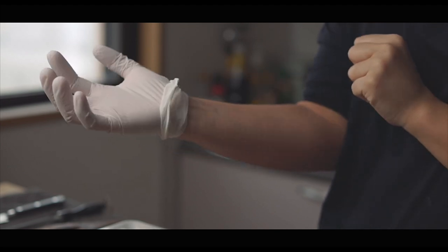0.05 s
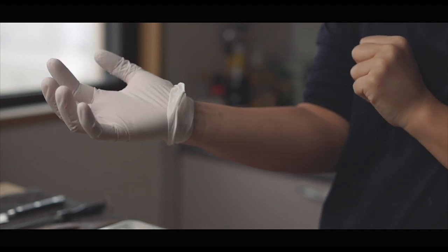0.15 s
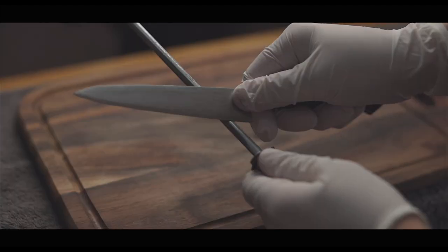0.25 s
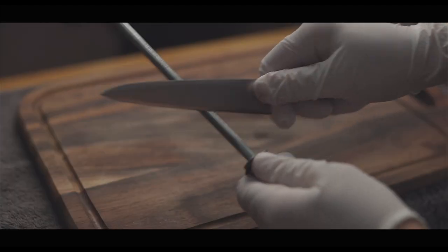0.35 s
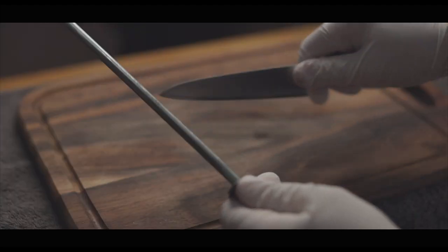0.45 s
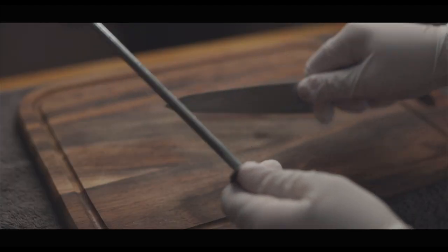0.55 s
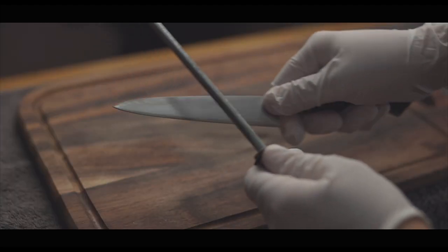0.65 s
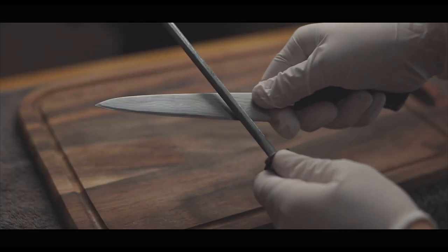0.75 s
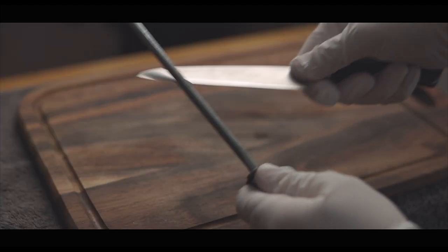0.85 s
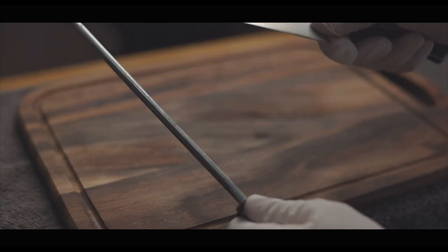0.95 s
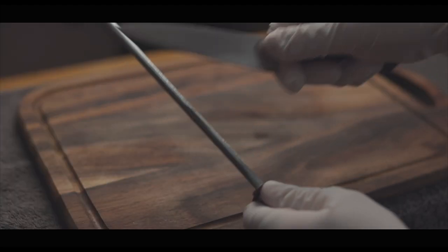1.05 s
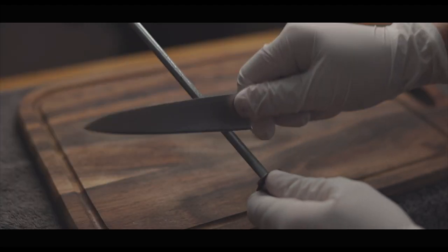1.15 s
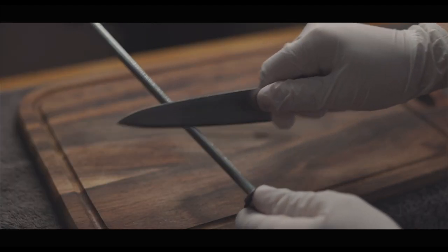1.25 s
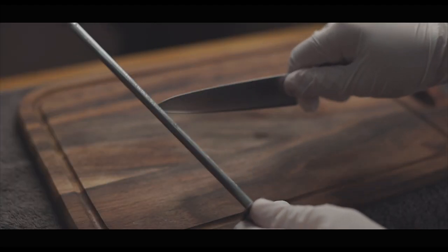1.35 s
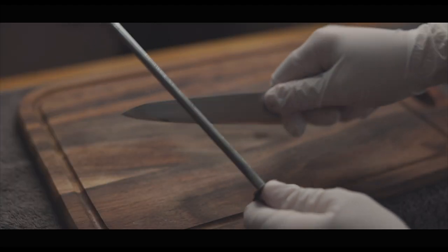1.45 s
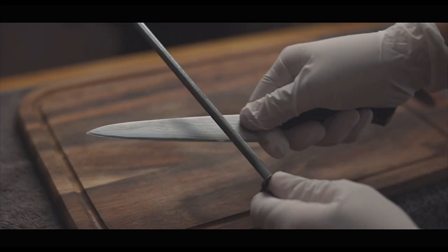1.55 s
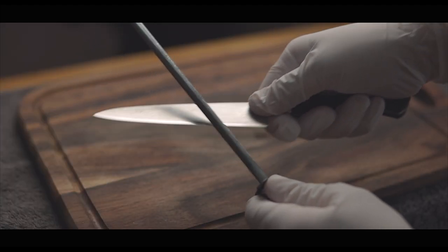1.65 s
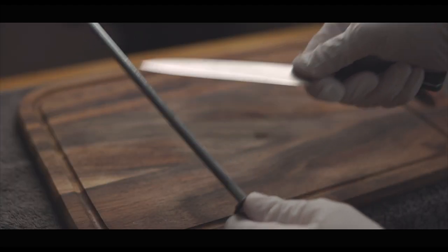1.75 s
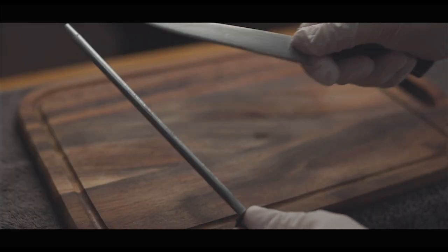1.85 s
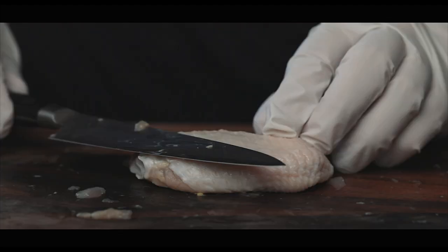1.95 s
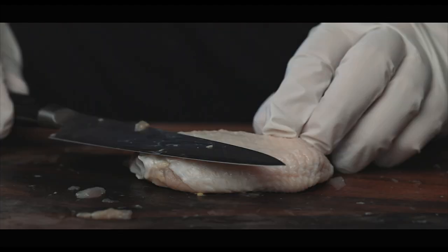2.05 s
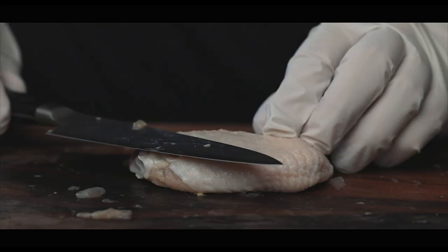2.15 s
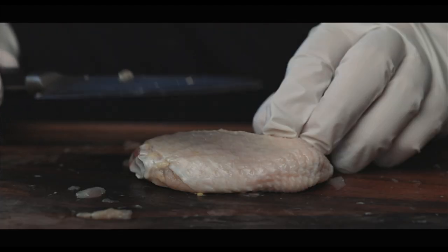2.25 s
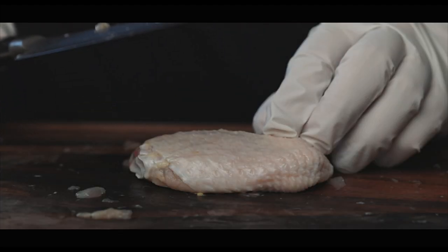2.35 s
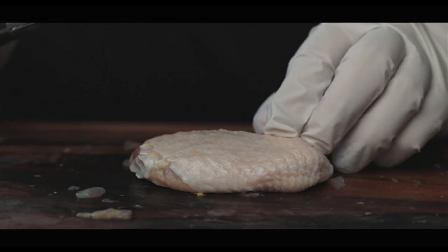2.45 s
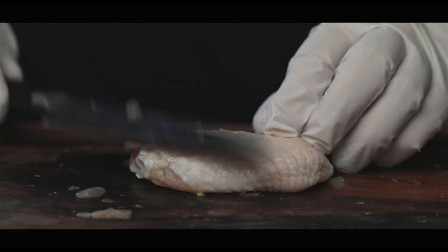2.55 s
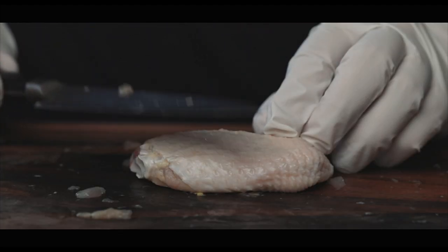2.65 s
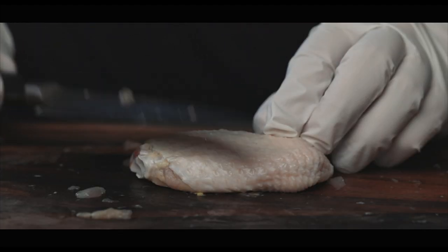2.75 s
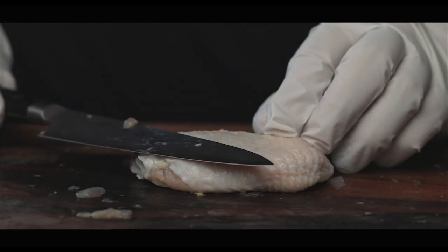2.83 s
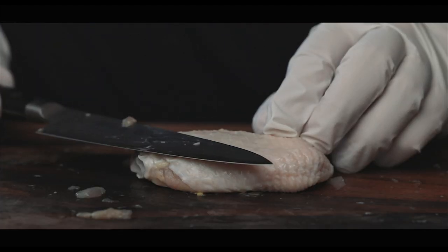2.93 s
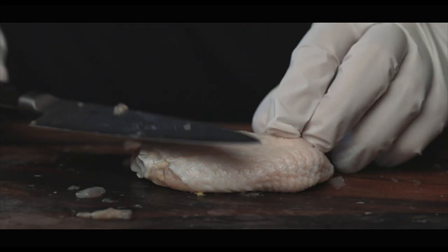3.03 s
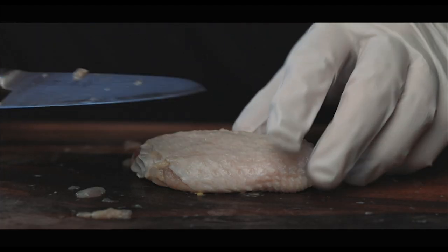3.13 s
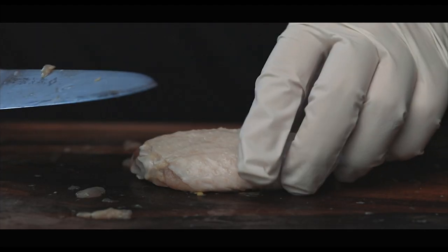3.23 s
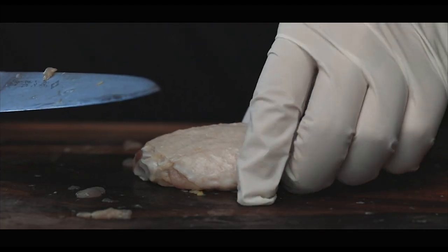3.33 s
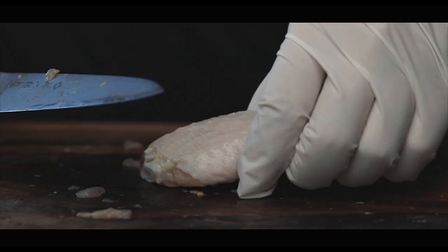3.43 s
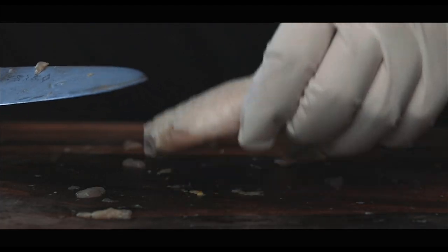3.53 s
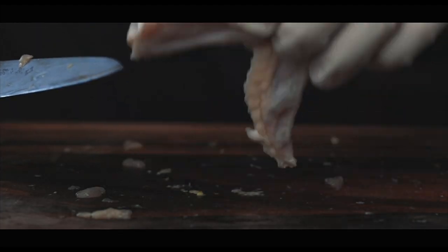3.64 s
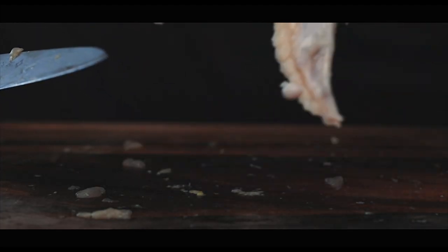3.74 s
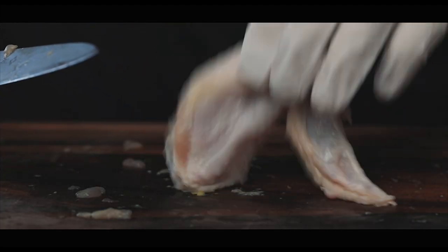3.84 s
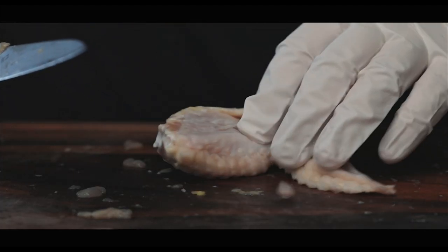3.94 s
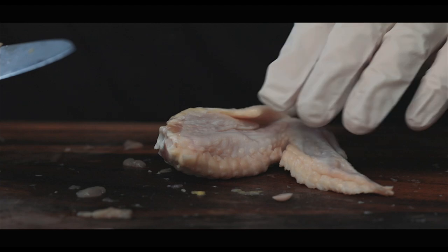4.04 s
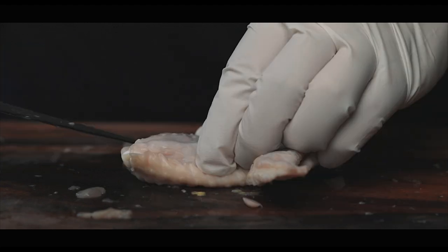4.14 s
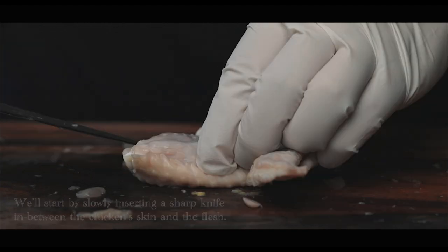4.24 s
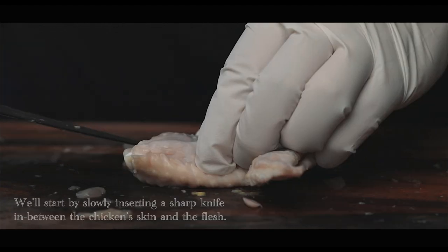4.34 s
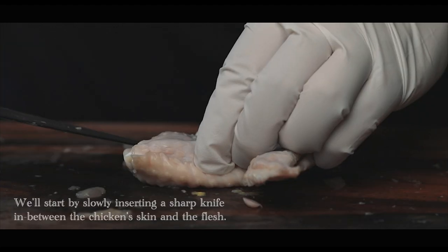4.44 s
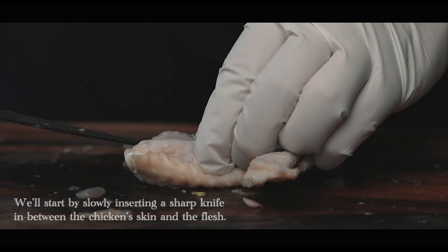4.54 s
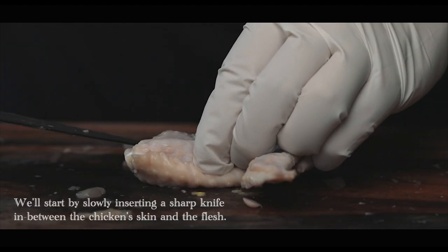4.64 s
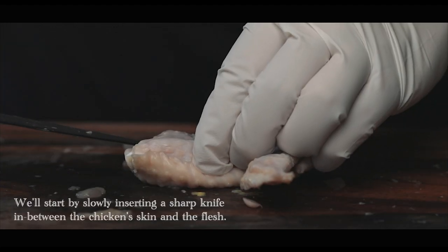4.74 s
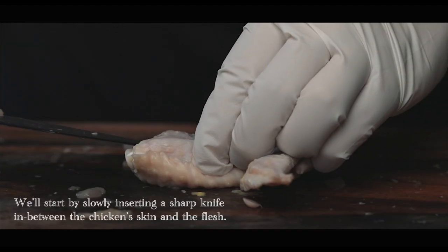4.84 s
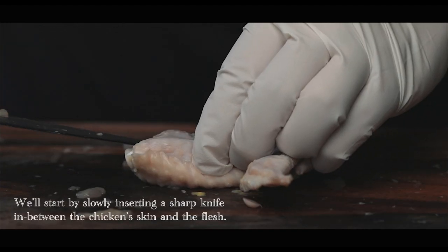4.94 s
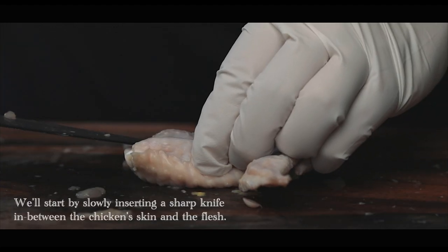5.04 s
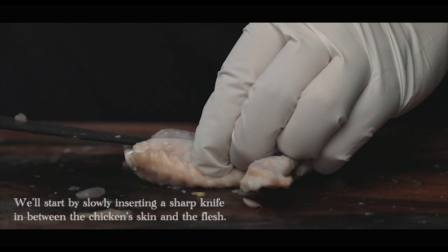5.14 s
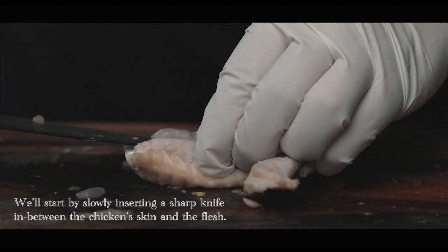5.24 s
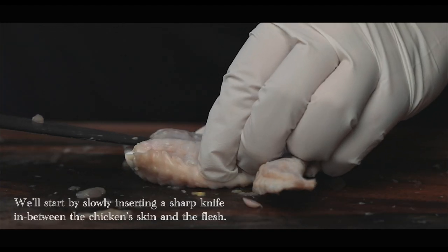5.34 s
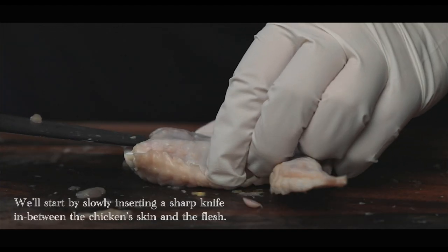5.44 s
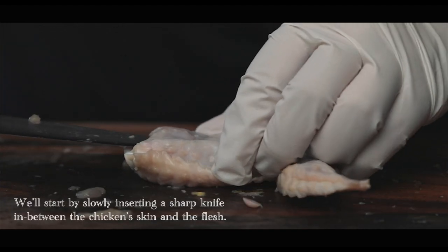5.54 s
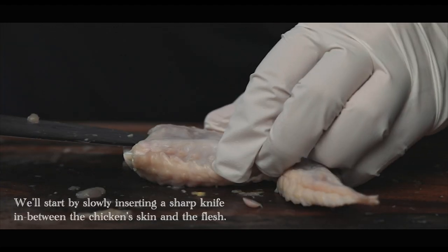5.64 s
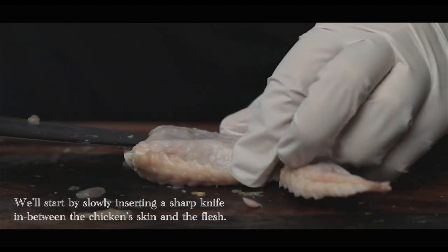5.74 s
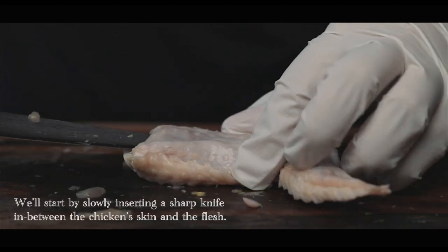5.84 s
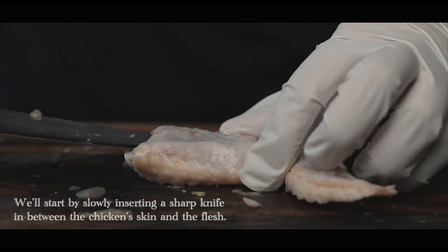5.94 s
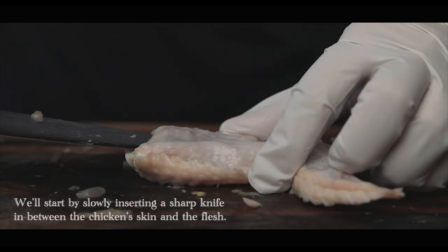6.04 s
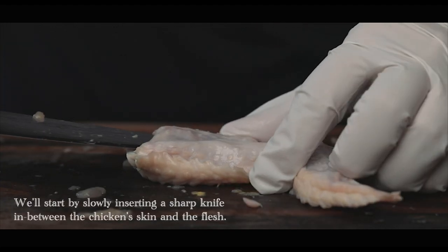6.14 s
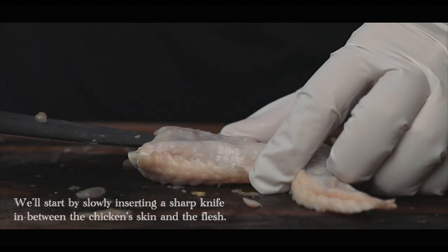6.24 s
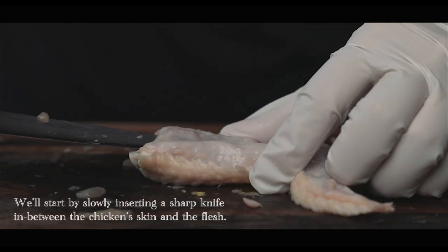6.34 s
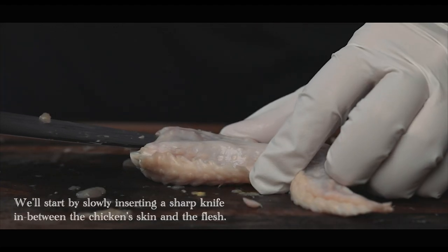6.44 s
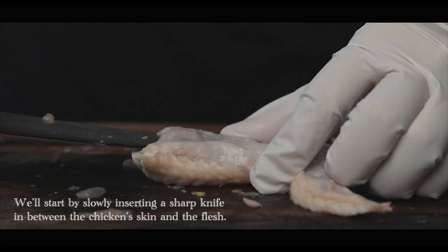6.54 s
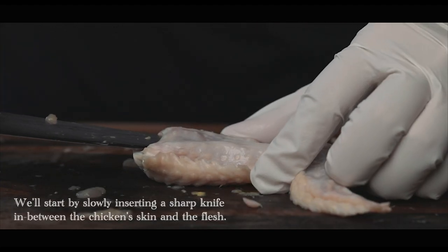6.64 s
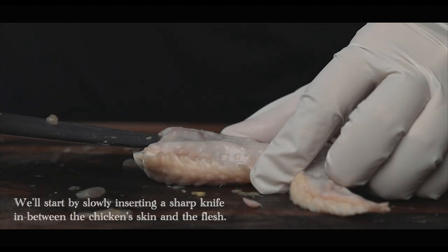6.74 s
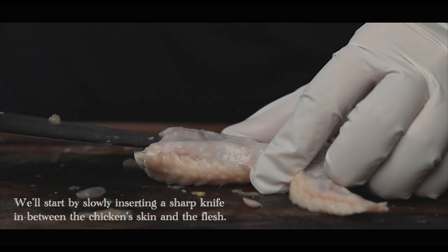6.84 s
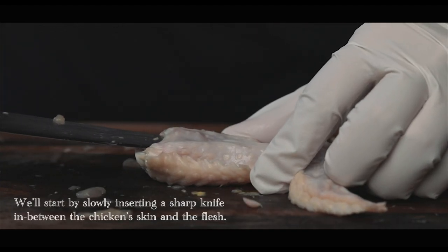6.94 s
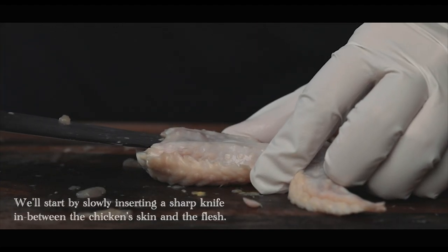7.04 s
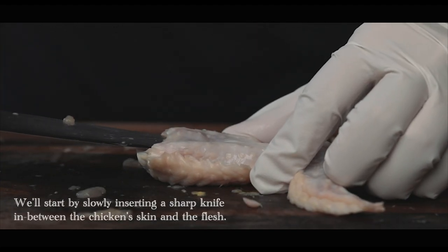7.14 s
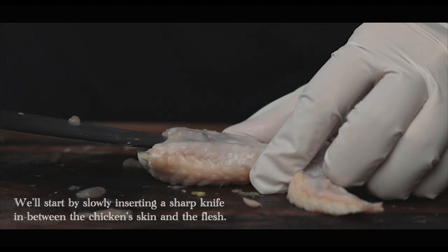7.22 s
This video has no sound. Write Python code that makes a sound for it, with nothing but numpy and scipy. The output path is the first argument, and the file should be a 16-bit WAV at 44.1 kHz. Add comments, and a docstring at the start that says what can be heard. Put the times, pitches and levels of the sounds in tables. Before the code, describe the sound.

A very close microphone in a small quiet kitchen, faint noise floor and deep handling rumble beneath. From 0 to 0.35 s the tail of a rubber glove snap dies away over a low throb and stops abruptly. A knife then strokes a honing steel four times, about 0.36-0.51, 0.81-0.96, 1.23-1.42 and 1.66-1.84 s: gritty scrapes rising to sharp, sizzling treble at the tip, the last three starting with a metallic crack, the fourth screeching briefly. At 2.68 and 2.89 s the flat blade pats raw poultry on wood, dull thuds with wet, sticky clicks. Gloved fingers rustle and crackle over the skin from 3.0 to 3.9 s, then the meat drops with a wet slap and heavier thump at 3.94-3.96 s. Rustling fades by 4.4 s. Near silence follows, with sparse ticks, moist rubs around 5.2, 5.7-5.8 and 6.2 s, and a faint low hum near 6.7 s.

```python
"""A knife is drawn four times along a honing steel: gritty noise rings the modes of blade and rod.
Before it a rubber glove snap dies away, as noise whose bands decay at their own speed. After it the flat pats
a raw wing on a wooden board (damped modes and wet slaps); gloved fingers turn the wing over, drop it and work
at the wet skin (rubs, ticks and squeaks of filtered noise). A close microphone on a swaying stand in a small
quiet kitchen."""
import sys
import numpy as np
from scipy import signal
from scipy.fft import rfft, irfft
from scipy.io import wavfile
from scipy.ndimage import uniform_filter1d

SR = 44100
rng = np.random.default_rng(int(sys.argv[2]) if len(sys.argv) > 2 else 0)


def generate_wav(sig):
    """Save sig (samples, or channels by samples) to the path in sys.argv[1] as 16-bit PCM at SR."""
    pcm = np.round(np.clip(np.atleast_2d(sig).T, -1, 1) * 32767).astype(np.int16)
    wavfile.write(sys.argv[1], SR, pcm)


def volts(x):
    """Linear amplitude factor 10**(x/20) for a level x in dB, scalar or array-like."""
    e = np.asarray(x, float) / 20
    return 10 ** e


N = 321048
SNAP_END_S = 0.3507  # the glove snap breaks off here

# modes of blade and rod: f/Hz, width/Hz, scraped level/dB, struck level/dB (both relative), struck t60/s,
# place of the first node/turns
STEEL_MODES = [(918, 90, -16.5, -21.5, .05, 0), (1284, 33, -21.5, 1.5, 0.081, 0.034),
               (1780, 43, -8.5, -7, 0.24, 0), (2104, 110, -2, -16.5, 0.09, 0.45),
               (2600, 200, 3.5, -0.5, 0.18, .2), (2825, 51, -5, -17, .15, 0.89),
               (3360, 82, -10.5, -8.5, 0.16, 0), (4140, 30, -18, -21, 0.16, 0.52),
               (4790, 160, -6, -11.5, 0.15, 0.01), (5850, 180, -5, -3.5, .1, 0.6),
               (6940, 59, -11, -13.5, 0.051, 1), (7810, 61, -16.5, -21, .1, 0),
               (7985, 140, -15.5, -18, 0.13, 1), (9270, 77, -5, -9, 0.18, 0.03),
               (11430, 90, -13.5, -20.5, 0.092, 1), (11400, 78, -3, -0.5, 0.1, .8),
               (12500, 50, 0, -17.5, .1, .3), (13700, 100, -5, -21.5, .1, 0.99),
               (13550, 82, -1, -9, 0.093, 0.57), (14750, 64, 0.5, -21.5, .1, .5),
               (14750, 87, 0, -16, .1, 0), (13400, 130, -4, -21, .1, 0.15)]
# modes of the wooden board: f/Hz, relative level/dB, t60/s
BOARD_MODES = [(58, 9.5, .18), (127, -10.5, 0.19), (264, -19.5, 0.089), (293.5, -17, 0.13),
               (474.6, -40, .06), (460, -24, 0.071), (475.8, -15.5, 0.041), (584.5, -21.5, 0.052),
               (708, -31, 0.047), (963, -38.5, 0.032)]


def evened(x):
    """Scales a sound to rms 1."""
    return x / np.sqrt(np.mean(x ** 2) + 1e-20)


def read(points, hz):
    """Reads a curve of (f/Hz, value) along a log frequency axis."""
    f, value = np.transpose(points)
    return np.interp(np.log(hz + 1), np.log(f + 1), value)


def curves(rows):
    """Draws each column after the first over the whole scene; the first is t/s."""
    s, *columns = np.transpose(rows)
    return [np.interp(np.arange(N) / SR, s, column) for column in columns]


def add(mix, s, sound):
    """Lays a sound into the mix at s seconds."""
    part = mix[round(s * SR):][:len(sound)]
    part += sound[:len(part)]


def band(x, lo_hz, hi_hz, order=2):
    """Keeps one frequency band."""
    sos = signal.butter(order, [lo_hz, min(hi_hz, .49 * SR)], "band", fs=SR, output="sos")
    return signal.sosfilt(sos, x)


def resonate(x, hz, width):
    """Shifts the curve hz down to zero, smooths, and shifts back: a resonance of gain 1."""
    turn = np.exp(2j * np.pi * np.cumsum(hz * np.ones(len(x))) / SR)
    r = np.exp(-np.pi * width / SR)
    return 2 * (turn * signal.lfilter([1 - r], [1, -r], x / turn)).real


def slow(size, hz):
    """Smooth random wander of rms 1, slower than hz."""
    sos = signal.butter(2, hz, fs=SR, output="sos")
    return evened(signal.sosfiltfilt(sos, rng.standard_normal(size)))


def coloured(spectrum):
    """Steady noise of a given colour and rms 1, as long as the scene."""
    hz = np.fft.rfftfreq(N, 1 / SR)
    return evened(irfft(rfft(rng.standard_normal(N)) * volts(read(spectrum, hz)), N))


def dying(spectrum, decay, size):
    """Noise of a given colour whose bands die at their own speed."""
    hz, t, z = signal.stft(rng.standard_normal(size), SR, nperseg=256)
    start_db = read(spectrum, hz)[:, None]
    fall_db = 60 * t / read(decay, hz)[:, None]
    return signal.istft(z * volts(start_db - fall_db), SR, nperseg=256)[1][:size]


def grit(size, per_s, spread_db):
    """Noise whose level jumps with random tiny asperities and sinks back within about a millisecond."""
    heights = volts(spread_db * np.minimum(rng.exponential(1, size), 3))
    bumps = heights * (rng.random(size) < per_s / SR)
    return evened(rng.standard_normal(size) * (1 + signal.lfilter([1], [1, -.96], bumps)))


def swell(peak_s, rise, fall, db):
    """Climbs 20 dB in each rise time, sinks 20 dB in each fall time; returns start and gain."""
    t = np.arange(-2 * rise, 2 * fall, 1 / SR)
    gain = volts(db - 20 * np.maximum(-t / rise, t / fall))
    return peak_s - 2 * rise, gain * signal.windows.tukey(len(t), .1)


def room(x, linger):
    """Reflections: a short dense tail, treble dying first, over a fainter long one; linger scales both t60."""
    # decay of the small room at linger 1: f/Hz, t60/s
    near_decay = [(200, 0.52), (1000, 0.34), (3000, 0.3), (8000, 0.25), (16000, 0.074)]
    # decay between hard far surfaces at linger 1: f/Hz, t60/s
    far_decay = [(300, 0.97), (1000, 0.87), (3000, .9), (8000, 0.32), (16000, 0.28)]
    near, far = (evened(dying([(100, 0.002), (16000, 0)], [(hz, t60 * linger) for hz, t60 in decay], SR))
                 for decay in (near_decay, far_decay))
    tail = np.pad(near + volts(-29) * far, (250, 0))  # starts 250 samples behind the direct sound
    return signal.fftconvolve(x, tail / np.linalg.norm(tail))[:N]


def still_air():
    """Faint steady noise of the kitchen, heaviest in the bass."""
    # colour of the noise floor: f/Hz, relative level/dB
    floor_colour = [(21, -30), (35, -2.5), (50, -9), (103, -26), (235, -30.5), (383, -37.5), (807, -36.5),
                    (992, -48), (3160, -50), (7570, -44), (8180, -39.5), (9540, -44), (14800, -42),
                    (16400, -60.5)]
    return volts(-72.5) * coloured(floor_colour)


def appliance_whines():
    """Narrow resonances of noise whose levels drift slowly."""
    # appliance whine: f/Hz, width/Hz, mean level/dB
    whine_bands = [(222, 13, -86), (807, 4, -93.5), (8140, 97, -90), (12600, 270, -90.5)]
    return sum(volts(db) * evened(resonate(rng.standard_normal(N), hz, width)) * volts(2.5 * slow(N, 1.5))
               for hz, width, db in whine_bands)


def low_hum():
    """A gliding sine that swells and wavers some eleven times a second."""
    # course of the hum: t/s, f/Hz, rms level/dB before the waver
    hum_course = [(2.25, 222, -96.5), (2.379, 225.5, -69.5), (2.5, 222, -95.5), (6.55, 240.8, -104.5),
                  (6.66, 241.5, -70), (6.74, 230.7, -58), (6.83, 222, -73), (6.92, 222, -61.5),
                  (7.02, 222, -80.5), (7.06, 222, -75.5), (7.181, 222, -95)]
    hz, db = curves(hum_course)
    waver = 1 + 0.15 * evened(resonate(rng.standard_normal(N), 11.0, 9.1))
    return volts(db) * waver * np.sqrt(2) * np.sin(2 * np.pi * np.cumsum(hz) / SR)


def airy():
    """Soft hiss of the room while the knife is honed, fading out after it."""
    # colour of the hiss: f/Hz, relative level/dB
    hiss_colour = [(180, -55), (300, -27), (433, -8), (584, -21.5), (678, -4.5), (1100, -13.5), (2070, -9),
                   (7950, -11.5), (16000, -15.5)]
    # course of the hiss: t/s, level/dB
    hiss_level = [(0, -67.5), (.7, -68.5), (1.199, -68.5), (2.0, -66), (2.2, -75), (2.32, -71.5),
                  (2.45, -79.5), (2.55, -88)]
    db = np.interp(np.arange(N) / SR, *np.transpose(hiss_level), right=-150)
    return coloured(hiss_colour) * volts(db)


def sway():
    """Mostly infrasonic swing of the stand while hands move, a little irregular in pace and level."""
    # strength of the swing: t/s, rms level/dB
    swing_level = [(0.36, -33), (0.45, -57.5), (1.17, -37.5), (1.48, -66.5), (1.75, -45.5), (2.57, -74),
                   (2.69, -48), (2.87, -50.5), (3.09, -37.5), (3.65, -57), (4.08, -37.5), (4.19, -50.5),
                   (4.99, -64.5), (5.35, -53.5), (5.51, -71.5), (6.28, -41.5), (6.33, -62.5), (7.28, -60.5)]
    # pace of the swing before its irregularity: t/s, f/Hz
    swing_pace = [(2.0, 12.9), (2.6, 19.5), (3.0, 12), (4.399, 15.5), (4.6, 18.8)]
    db, = curves(swing_level)
    hz, = curves(swing_pace)
    hz = hz * (1 + 0.064 * slow(N, 2.9))
    swing = np.sqrt(2) * np.sin(2 * np.pi * np.cumsum(hz) / SR)
    bumps = volts(-18) * evened(band(rng.standard_normal(N), 13.0, 32., order=3))
    return volts(db) * (swing + bumps) * (np.arange(N) > SNAP_END_S * SR)


def glove():
    """Tail of the snap as dying noise over the decaying 15 Hz swing of the stand, both chopped at the end."""
    # colour of the snap: f/Hz, relative level per Hz/dB
    snap_colour = [(18, -31), (30, 0), (56, -2), (103, -39.5), (473, -31), (554, -29.5), (1070, -25.5),
                   (4420, -28.5), (9710, -39), (16000, -50)]
    # decay of the snap: f/Hz, t60/s
    snap_decay = [(100, 0.8), (1000, 0.27), (4000, 0.28), (9000, 0.23), (16000, 0.36)]
    t = np.arange(round(SNAP_END_S * SR)) / SR
    tail = dying(snap_colour, snap_decay, len(t))
    tail *= volts(-29) / np.std(tail[:900])  # level of the first 20 ms
    swing_db = -18.5 - 60 * t / 6.1  # t60 6.1 s
    swing = volts(swing_db) * np.sin(2 * np.pi * (15 * t + 0.62))  # starts at 0.62 turns
    return np.pad(tail + swing, (0, N - len(t)))


def skin_slaps():
    """Wet slaps of skin: short decaying bursts of noise."""
    # slaps: t/s, peak level/dB, time constant of the fall/s, top f/Hz
    slap_events = [(2.6837, -30.5, .003, 16000), (2.8936, -31.5, 0.002, 15900), (3.9416, -18, 0.0061, 6000),
                   (3.9629, -36.5, .006, 3000)]
    t, out = np.arange(SR // 2) / SR, np.zeros(N)
    for s, db, fall, top_hz in slap_events:
        slap = band(rng.standard_normal(len(t)) * np.exp(-t / fall), 910, top_hz)
        add(out, s, volts(db) * slap / abs(slap).max())
    return out


def board_knocks():
    """Soft blows ring the board's damped modes; each blow has its own rise time."""
    # blows: t/s, peak level/dB, tilt of the modes/dB per octave, time constant of the rise/s
    knock_events = [(2.6824, -19, 5, 0.0037), (2.894, -19, 5.5, 0.0025), (3.9419, -34.5, 11.5, .001),
                    (3.9629, -12, 12, 0.0039)]
    t, out = np.arange(SR // 2) / SR, np.zeros(N)
    for s, db, tilt_db, rise in knock_events:
        # the first swing is negative
        ring = sum(-volts(level_db + tilt_db * np.log2(hz / 60) - 60 * t / t60) * np.sin(2 * np.pi * hz * t)
                   for hz, level_db, t60 in BOARD_MODES)
        ring = ring * (1 - np.exp(-(t / rise) ** 2))
        add(out, s, volts(db) * ring / abs(ring).max())
    return out


def board_drags():
    """Rod, wing and fingers press and drag on the board: noise rumbles in its modes."""
    # drags: peak t/s, rise per 20 dB/s, fall per 20 dB/s, peak level/dB, tilt of the modes/dB per octave
    drag_events = [(0.419, .03, .5, -63, 3), (1.72, .1, .3, -68.5, 0), (3.0, .05, 0.9, -51.5, 1),
                   (3.31, 0.23, 0.14, -50, -2), (3.456, 0.055, 0.077, -51, -18),
                   (3.542, 0.12, 0.096, -54.5, -2), (3.679, .15, .08, -69, 1),
                   (3.93, 0.033, 0.027, -52, 3.5), (5.401, 0.058, 0.11, -79.5, 5),
                   (5.714, 0.17, 0.053, -77, 9), (5.812, 0.053, .2, -72, 14),
                   (6.032, 0.029, 0.097, -68.5, 5.5), (6.219, .15, 0.21, -71.5, 1.5)]
    out = np.zeros(N)
    for peak_s, rise, fall, db, tilt_db in drag_events:
        s, gain = swell(peak_s, rise, fall, db)
        push = rng.standard_normal(len(gain) + 4000)  # 4000 samples for the modes to build up
        rumble = sum(volts(level_db + tilt_db * np.log2(hz / 60))
                     * evened(resonate(resonate(push, hz, 2.1 / t60), hz, 5.1 / t60))
                     for hz, level_db, t60 in BOARD_MODES)
        add(out, s, gain * evened(rumble[4000:]))
    return out


def patchy(x, patch_db):
    """Wet folds colour a rub in patches about 1 kHz wide that last some 26 ms."""
    z = signal.stft(x, nperseg=256)[2]
    patches = uniform_filter1d(rng.standard_normal(z.shape), size=7, axis=0)
    patches = evened(uniform_filter1d(patches, size=9, axis=1))
    return signal.istft(z * volts(patch_db * patches), nperseg=256)[1][:len(x)]


def skin_rubs():
    """Rubber on wet skin: gritty bright noise with a duller rustle below; returns sound and effort."""
    # rubs: peak t/s, rise per 20 dB/s, fall per 20 dB/s, peak level/dB, centre f/Hz, relative rustle level/dB
    rub_events = [(2.685, .002, 0.0077, -31, 11400, -14.5), (2.71, .01, .08, -56.5, 11000, -21),
                  (2.895, .002, 0.02, -41.5, 9900, -10), (3.01, .05, .03, -73.5, 10100, -12),
                  (3.12, .1, 0.061, -64.5, 8860, -6.5), (3.143, .002, 0.0227, -47.5, 5000, -10),
                  (3.175, .04, .08, -52.5, 5300, -24), (3.241, .004, .014, -39.5, 10200, -27),
                  (3.273, .035, .04, -46.5, 9900, -16), (3.35, .1, 0.091, -55, 5200, -10),
                  (3.422, .12, .07, -48, 5040, -15), (3.507, .012, 0.022, -39.5, 5700, -11.5),
                  (3.535, .02, .04, -57, 5760, -11), (3.668, .06, .1, -52.5, 4800, -7),
                  (3.67, .05, .1, -52, 8800, -15), (3.72, .03, .02, -56.5, 9000, -22),
                  (3.79, .02, 0.12, -58, 10000, -22), (3.835, .08, 0.052, -57.5, 7700, -11),
                  (3.93, .07, .05, -60, 7860, -7.5), (3.964, .03, 0.043, -51.5, 7500, -1),
                  (4.0, .04, .022, -41, 7000, -10), (4.05, .1, 0.11, -52.5, 7450, -12),
                  (4.098, .05, .04, -56.5, 5000, -27), (4.27, .09, .07, -65, 8330, -8.5),
                  (5.22, .012, .016, -55.5, 10920, -17.5), (5.222, .01, .02, -61.5, 4190, -13),
                  (5.28, .1, 0.13, -73, 9100, -12), (5.49, .15, .3, -66, 8000, -14),
                  (5.67, .06, 0.14, -53.5, 9560, -19.5), (5.8, .015, .05, -41.5, 10000, -15.5),
                  (5.802, .015, .05, -45.5, 4670, -7.5), (5.85, .05, .06, -56, 7000, -3.5),
                  (5.96, .1, .12, -68.5, 5500, -10), (6.15, .16, .09, -55, 6500, -18),
                  (6.265, .09, .07, -62, 6030, -15.5), (6.36, .1, .2, -71, 6470, -8),
                  (6.575, .03, .1, -76.5, 10900, -11.5)]
    out, effort = np.zeros(N), np.zeros(N)
    for peak_s, rise, fall, db, hz, low_db in rub_events:
        s, gain = swell(peak_s, max(rise, .002), max(fall, .005), db)
        rub = patchy(grit(len(gain) + 512, per_s=460, spread_db=1.0), patch_db=4.0)[512:]
        bright = resonate(resonate(rub, hz, 5800), hz, 3500) + volts(-3.5) * rub
        bright = evened(band(bright, 3500, 21000))
        low = band(rub, 1100, 2730)
        low = evened(low + volts(6.5) * resonate(low, 1991, 750))
        add(out, s, gain * (bright + volts(low_db) * low))
        add(effort, s, gain)
    return out, effort


def tick(hz):
    """A puff of noise through a wide resonance, peak 1."""
    puff = rng.standard_normal(600) * np.exp(-np.arange(600) / SR / .0005)
    sound = resonate(resonate(puff, hz, 0.56 * hz), hz, 0.56 * hz) + volts(-23.5) * puff
    sound = band(sound, 0.32 * hz, 19000)
    return sound / abs(sound).max()


def sticky_ticks(effort):
    """Rubber and skin let go: single ticks, and small ones falling at random under the rubs."""
    # single ticks: t/s, peak level/dB, centre f/Hz
    tick_events = [(2.6846, -16, 12500), (2.8944, -20.5, 9010), (3.0037, -49, 10700), (3.0768, -47, 8140),
                   (3.1418, -30, 5100), (3.24, -35, 9590), (3.3968, -37, 7900), (3.4263, -40, 11000),
                   (3.5399, -40, 4740), (3.614, -44, 9000), (3.7103, -34, 7500), (3.7865, -35, 12500),
                   (3.906, -35.5, 14600), (3.9422, -21.5, 3280), (3.998, -17.5, 7400), (4.0741, -36, 1907),
                   (4.1995, -58, 8100), (4.6668, -47.5, 12450), (5.0801, -52.5, 12500),
                   (5.2167, -42.5, 11900), (5.3998, -45, 5080), (5.4955, -43.5, 9700),
                   (5.5784, -48.5, 7400), (5.5849, -42, 13840), (5.6432, -41, 7910), (5.667, -29.5, 13670),
                   (5.9503, -50.5, 5270), (6.0785, -46.5, 6500), (6.177, -41, 6690), (6.568, -49, 11960)]
    out = np.zeros(N)
    small_per_s = 76  # over all eight pitches
    for hz in np.geomspace(4500, 13500, 8):
        train = rng.random(N) < small_per_s / 8 / SR
        train = train * volts(3.5 * np.minimum(rng.exponential(1, N), 3))
        out += signal.oaconvolve(volts(5) * effort * train, tick(hz))[:N]  # 5 dB or more over the effort
    for s, db, hz in tick_events:
        add(out, s, volts(db) * tick(hz))
    return out


def squeaks(rows):
    """Short narrow resonances of gritty noise."""
    out = np.zeros(N)
    for s, length, hz, db in rows:
        size = round(length * SR)
        tone = resonate(grit(size, per_s=300, spread_db=3.5), hz, 150.)
        tone = evened(resonate(tone, hz, 300.0))
        add(out, s, volts(db) * tone * signal.windows.tukey(size, .6))
    return out


def skin_squeaks():
    """Wet skin squeaks on small cavities, and near 5.21 s a tick that rings on at four pitches."""
    # squeaks: t/s, length/s, f/Hz, level/dB
    squeak_events = [(2.987, 0.071, 694, -72.5), (3.162, 0.033, 1580, -62), (3.356, 0.15, 580, -76.5),
                     (3.604, 0.084, 1300, -74), (4.058, 0.029, 1870, -58.5), (4.255, .05, 630, -72.5),
                     (4.26, 0.016, 1410, -63.5), (5.21, 0.18, 1876, -80.5), (5.211, 0.19, 2600, -81),
                     (5.206, 0.12, 3640, -80), (5.204, 0.14, 4890, -78), (5.534, 0.15, 661, -80.5),
                     (5.659, 0.11, 1890, -73.5), (5.661, 0.065, 1374, -83), (6.07, 0.15, 1126, -72),
                     (6.086, 0.12, 2070, -80)]
    return squeaks(squeak_events)


def edge_screeches():
    """The edge screeches on the rod."""
    # screeches: t/s, length/s, f/Hz, level/dB
    screech_events = [(1.748, .05, 2660, -34.5), (1.785, .045, 2200, -36)]
    return squeaks(screech_events)


def edge_landings():
    """The blade lands on the rod: a crack of noise and the struck modes of the steel."""
    # landings: t/s, peak level of the crack/dB, tilt of the modes/dB per octave
    landing_events = [(0.809, -9, 2.5), (1.233, -11, 3.5), (1.664, -17, -1)]
    t, out = np.arange(12000) / SR, np.zeros(N)
    for s, db, tilt_db in landing_events:
        crack = band(rng.standard_normal(len(t)) * np.exp(-t / 0.0018), 610, 16000, order=3)
        modes = sum(volts(struck_db + tilt_db * np.log2(hz / 3000) - 60 * t / t60) * np.sin(2 * np.pi * hz * t)
                    for hz, _, _, struck_db, t60, _ in STEEL_MODES)
        ring = volts(-5.0) * band(modes, 790, 16000) / abs(modes).max()
        add(out, s, volts(db) * (crack / abs(crack).max() + ring))
    return out


def edge_catches():
    """The edge catches near the tip: bright bursts of noise a few milliseconds long."""
    # catches: t/s, peak level/dB
    catch_events = [(0.4907, -8), (0.495, -6), (0.5026, -12.5), (0.9366, -9), (0.9405, -9.5),
                    (0.9477, -11.5), (0.9532, -9.5), (1.346, -17), (1.365, -13.5), (1.383, -13.5),
                    (1.3963, -8.5), (1.4023, -10), (1.411, -15), (1.803, -10.5), (1.817, -14.5),
                    (1.8278, -9.5)]
    t, out = np.arange(300) / SR, np.zeros(N)
    envelope = np.minimum(t / 0.0013, 1) * np.exp(-t / .0045)  # rise and fall in s
    for s, db in catch_events:
        burst = band(rng.standard_normal(len(t)) * envelope, 9000, 16000)
        add(out, s, volts(db) * burst / abs(burst).max())
    return out


def steel(x, meet, plain_db, flicker_db, wander, hz_per_node):
    """Each mode flares and fades as the contact point slides across its nodes; higher modes have more nodes."""
    place = np.linspace(0, 1, len(x))  # along the stroke, 1 at the tip
    rings = volts(plain_db) * x
    for hz, width, db, _, _, node in STEEL_MODES:
        reach = 0.1 + np.sin(np.pi * (place * (1 + hz / hz_per_node) + node + meet)) ** 2
        thin_db = -16. * place * max(np.log2(2100 / hz), 0)  # the light tip hardly drives the low modes
        drive = x * reach * volts(db + thin_db + flicker_db * slow(len(x), 60.))
        rings = rings + np.sqrt(200 / width) * resonate(drive, hz * (1 + wander * (place - .5)), width)
    return rings


def honing_strokes():
    """Grit scrapes through the steel, pressure favouring the top band; returns sound and middle envelope."""
    # pressure of the edge on the rod, one curve a stroke: t/s, level of the top band/dB
    stroke_pressure = [
        [(0.36, -71), (0.38, -65.5), (0.436, -36), (0.498, -18.5), (0.504, -21.5), (0.51, -27.5)],
        [(0.819, -37), (0.845, -45), (0.909, -36.5), (0.931, -21), (0.957, -20.5), (0.965, -22.5)],
        [(1.242, -36), (1.254, -49.5), (1.372, -20), (1.386, -25), (1.402, -15), (1.42, -31)],
        [(1.672, -45), (1.73, -59.5), (1.748, -42), (1.765, -29.5), (1.806, -23.5), (1.832, -23.5), (1.84, -35)],
    ]
    # colour of each stroke at the pivot: relative low level/dB, relative middle level/dB,
    # where the edge meets the rod/turns
    stroke_tone = [(-15.5, -12, .7), (-12, -8, .05), (-13, -8, 0.098), (-5.5, 2.5, .45)]
    pivot_db = -30
    low_lag, mid_lag = 0.64, 0.3  # dB that low ring and middle fall behind for each dB of added pressure
    out, envelope = np.zeros(N), np.zeros(N)
    for rows, (low_db, mid_db, meet) in zip(stroke_pressure, stroke_tone):
        s, db = np.transpose(rows)
        t = np.arange(s[0], s[-1], 1 / SR)
        scrape_db = np.interp(t, s, db)
        low_db = low_db - low_lag * (scrape_db - pivot_db)
        mid_db = mid_db - mid_lag * (scrape_db - pivot_db)
        scrape = grit(len(t), per_s=1100, spread_db=3.0)
        ring = steel(scrape, meet, plain_db=-26.0, flicker_db=4.5, wander=0.043, hz_per_node=5000)
        low = evened(band(ring, 600, 4060, order=3))
        mid = evened(band(ring, 4000, 7170, order=3))
        top = evened(band(ring, 10000, 49000, order=3))  # band() limits the upper edge to .49 SR
        on = volts(scrape_db) * signal.windows.tukey(len(t), .04)
        add(envelope, s[0], on * volts(mid_db))
        add(out, s[0], on * (top + volts(low_db) * low + volts(mid_db) * mid))
    return out, envelope


def scene():
    """Sums background, glove, board, hands and honing, and adds side noise that follows the scrape; returns
    left and right."""
    drop_end_s = 4.171
    drop_end = round(drop_end_s * SR)

    strokes, envelope = honing_strokes()
    scrape = strokes + edge_catches() + edge_landings() + edge_screeches()
    rubs, effort = skin_rubs()
    hands = rubs + sticky_ticks(effort) + skin_squeaks()

    knocks = board_knocks() + skin_slaps() + board_drags()
    thump = knocks + volts(-16.5) * room(knocks, linger=0.67)
    thump[:round(SNAP_END_S * SR)] = 0
    thump[drop_end:round((drop_end_s + .5) * SR)] = 0  # the drop's ring breaks off abruptly

    wet = room(volts(-8.5) * scrape + volts(-12.0) * hands, linger=1)
    swing = sway()
    fade = round(.03 * SR)
    # the sway breaks off with the drop and fades back in over 30 ms
    swing[drop_end:round((drop_end_s + .03) * SR)] *= np.linspace(0, 1, fade)
    background = still_air() + appliance_whines() + low_hum() + airy()
    mid = glove() + swing + scrape + thump + hands + wet + background

    # noise of its own at 4.6-11 kHz, opposite in the two channels, follows the scrape
    wide = envelope * evened(band(rng.standard_normal(N), 4600, 11000, order=4))
    side = volts(-7) * (wide + volts(-6) * room(wide, linger=1))
    return np.array([mid + side, mid - side])


def top_cut(x):
    """Nothing passes above the cut-off."""
    return signal.sosfilt(signal.butter(12, 16530, fs=SR, output="sos"), x)


def record(dry):
    """The microphone chain rolls off steeply at the very top, from 16 kHz."""
    rolled = signal.sosfilt(signal.butter(8, 16000, fs=SR, output="sos"), dry)
    return top_cut(rolled)


dry = scene()
out = record(dry)
generate_wav(out)
```